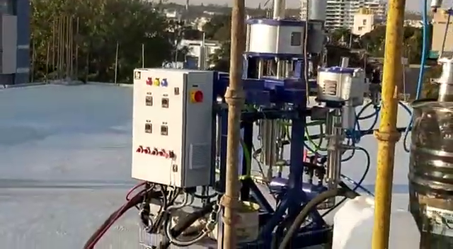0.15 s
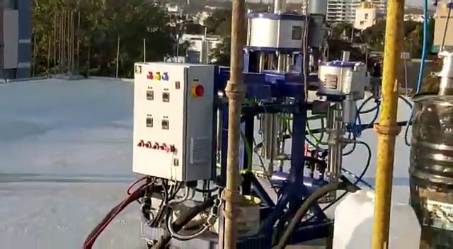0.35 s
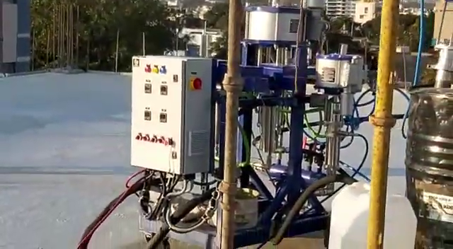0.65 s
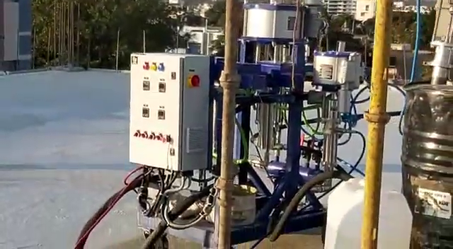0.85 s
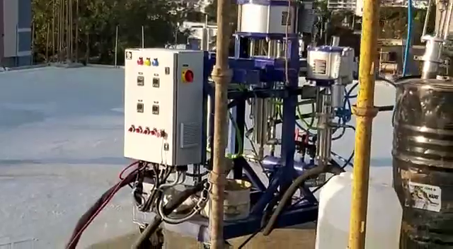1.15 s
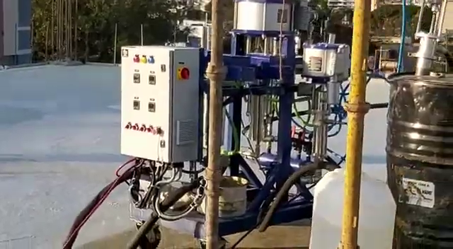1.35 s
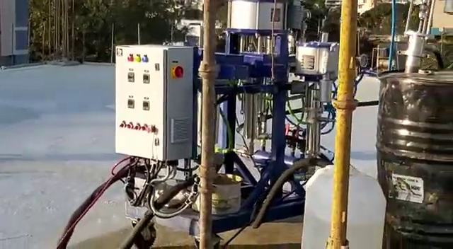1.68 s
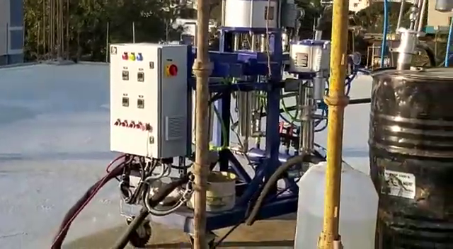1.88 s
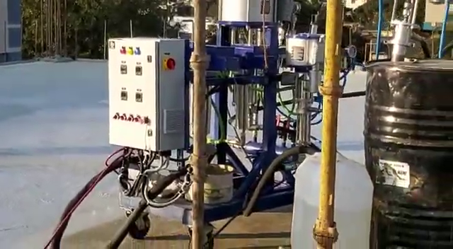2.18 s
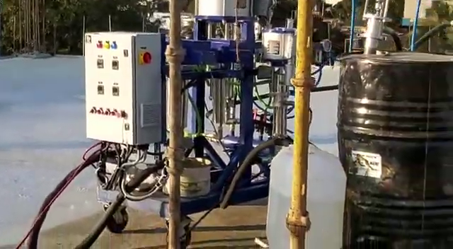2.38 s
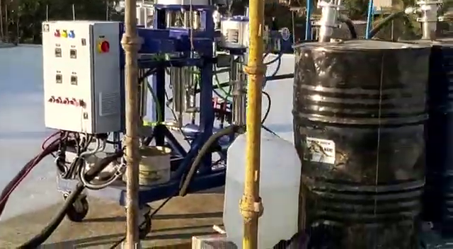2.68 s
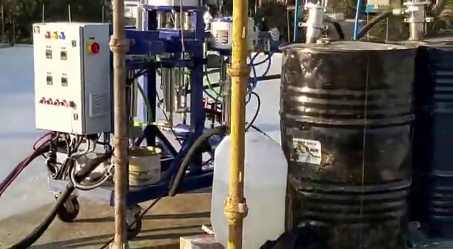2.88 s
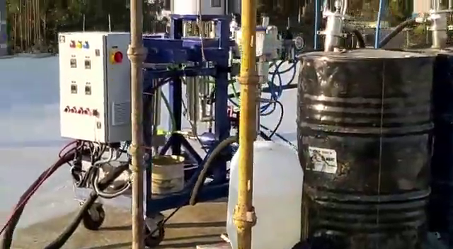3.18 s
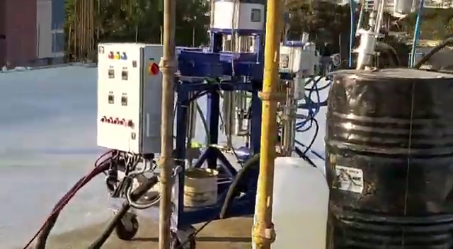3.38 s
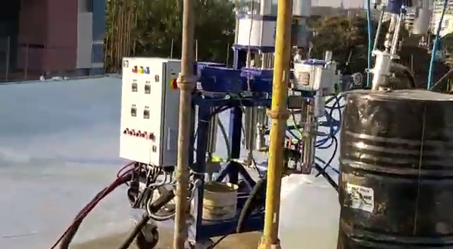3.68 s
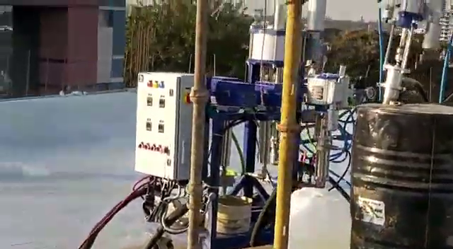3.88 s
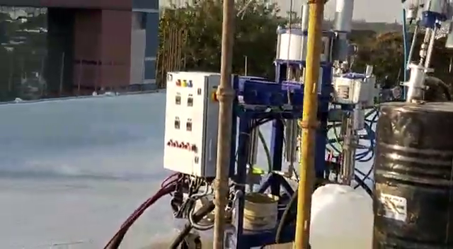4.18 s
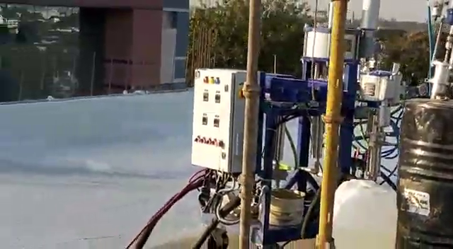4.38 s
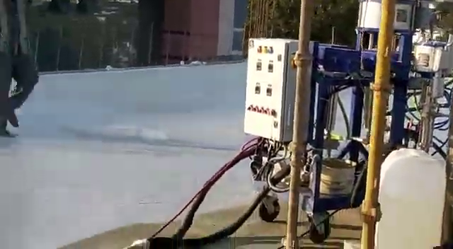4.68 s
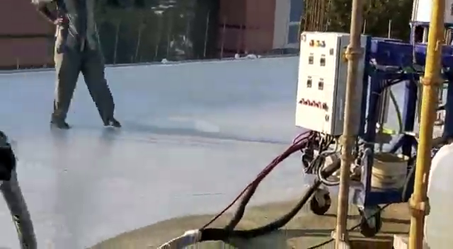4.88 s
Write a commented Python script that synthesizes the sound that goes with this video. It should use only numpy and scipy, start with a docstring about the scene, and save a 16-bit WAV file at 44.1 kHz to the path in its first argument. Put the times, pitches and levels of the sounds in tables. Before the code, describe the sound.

An air-driven pump on an open rooftop thumps and blasts out air three times over a steady, swelling hiss and low rumble.

```python
"""The big pump of an air-driven spray coating rig works on an open rooftop, a few metres from a hand-held phone.
At each end of its stroke a valve thumps and the cylinder dumps its air through a muffler: shaped noise and damped tones.
Smaller feed pumps puff and knock in between: short bursts of coloured noise.
Behind them lie a swelling hiss of escaping air, combed by its bounce off the roof, and a low outdoor rumble."""
import sys
import numpy as np
from scipy import signal
from scipy.fft import irfft
from scipy.io import wavfile

SR = 44100
rng = np.random.default_rng(int(sys.argv[2]) if len(sys.argv) > 2 else 0)


def put_to_file(sound):
    """Save the sound as 16-bit audio at rate SR, in the file named by the first command-line argument."""
    columns = np.atleast_2d(sound).T  # one column per channel
    safe = np.clip(columns, -1, 1)
    whole_steps = np.round(safe * 32767)
    wavfile.write(sys.argv[1], SR, whole_steps.astype(np.int16))


N = 222689
EDGE_HZ = 15950  # all sound lies below this frequency
TIME, FREQ = np.arange(N) / SR, np.fft.rfftfreq(2 ** 18, 1 / SR)

# exhausts of the big pump: start_s, blast_db, full_flow_s, fall_t60_s, valve_thump_db, valve_pitch_hz,
# frame_thud_db, port_resonance_hz, brightness_db_per_octave, wait_until_rebound_s, rebound_db,
# shell_db, down (stroke: 0 up, 1 down)
BIG_PUMP_STROKES = [(0.6443, -15, 0.031, 0.42, -12, 316, -19, 810, -0.9, 0.025, -13.5, 0.5, 0),
                    (2.22, -18.5, 0.051, 0.45, -30, 286, -12.5, 706, 1.5, 0.107, -21.5, -6, 1),
                    (3.982, -15.5, 0.039, 0.38, -12, 341, -20, 658, -1, 0.039, -16, -0.5, 0)]
# coherence of an air jet between the microphone ports: frequency_hz, likeness
JET_LIKENESS = [(100, .98), (1400, .95), (2300, .82), (3400, .5), (5000, .76), (8500, .42), (11000, .85),
                (15500, .76)]


def amp(db):
    """Level law: decibels to an amplitude gain."""
    return 10 ** (np.asarray(db) / 20)


def unit(x):
    """Normalisation: scales a signal to rms 1."""
    return x / np.sqrt(np.mean(x ** 2) + 1e-20)


def read(points, hz):
    """Spectral envelope: interpolates a table on a log-frequency axis."""
    f, value = np.transpose(points)
    return np.interp(np.log(hz + 1), np.log(f + 1), value)


def wander(rate, count=24):
    """Slow modulation of rms 1: sines of random phase from a tenth of rate up to rate (Hz)."""
    knots = np.arange(0, N + 64, 64) / SR
    wave = sum(
        np.sin(2 * np.pi * (f * knots + rng.random()))
        for f in np.geomspace(rate / 10, rate, count)
    )
    return unit(np.interp(TIME, knots, wave))


def patches(shape, rows, columns):
    """Random field of rms 1, made smooth by a Gaussian low-pass along both axes."""
    a, b = np.fft.fftfreq(shape[0])[:, None], np.fft.fftfreq(shape[1])
    smooth = np.exp(-(a * rows) ** 2 - (b * columns) ** 2)
    return unit(np.fft.ifft2(np.fft.fft2(rng.standard_normal(shape)) * smooth).real)


def air(gain, same, phase=0):
    """Turbulence noise: a coloured random spectrum at two ports, partly coherent, left leading by phase (rad)."""
    a, b, c, d = rng.standard_normal((4, len(FREQ)))
    same = np.clip(same, 0, 1)
    left = a + 1j * b
    unlike = c + 1j * d
    right = same * left * np.exp(-1j * phase) + np.sqrt(1 - same ** 2) * unlike
    spectrum = np.array([left, right]) * gain * (FREQ < EDGE_HZ)
    return unit(irfft(spectrum)[:, :N])


def burst(s, rise, hold, t60):
    """Pressure release: a linear rise, full flow until hold seconds, then exponential decay."""
    t = TIME - s
    opening = np.clip(t / max(rise, 1e-4), 0, 1)
    return opening * amp(-60 * np.maximum(t - hold, 0) / t60)


def ring(s, hz, rise, t60):
    """Free vibration of one damped mode."""
    return np.sin(2 * np.pi * hz * (TIME - s)) * burst(s, rise, rise, t60)


def band(hz, width):
    """Resonance curve: gain 1 at the centre and one half at width (Hz) to either side."""
    return 1 / (1 + ((FREQ - hz) / width) ** 2)


def delayed(x, s):
    """Propagation delay: the same sound, s seconds later."""
    return np.pad(x, ((0, 0), (round(s * SR), 0)))[:, :N]


def rumble(lump_db=3.0, lag_s=0.00034, waver=0.0052):
    """Low-passed ambient noise of the town and the breeze, with faint frequency-modulated machine tones."""
    # colour of the noise: frequency_hz, level_db
    rumble_colour = [(20, -39), (35, -17), (60, -2), (95, -2), (140, -3), (200, -8), (290, -6), (400, -10),
                     (500, -17)]
    # coherence between the ports: frequency_hz, likeness
    rumble_likeness = [(30, 0.54), (100, 0.79), (400, 0.91)]
    # course of the noise level: time_s, level_db
    rumble_course = [(0, -37.5), (.55, -32.5), (.95, -38.5), (1.8, -39), (2.7, -36.5), (3.9, -35.5),
                     (5.05, -38)]
    # machine tones: pitch_hz, level_db (rms)
    machine_tones = [(98, -48), (297, -50.5), (393, -56), (2000, -58.5)]
    colour = amp(read(rumble_colour, FREQ)) / (1 + (FREQ / 620) ** 8)
    noise = air(colour, read(rumble_likeness, FREQ), 2 * np.pi * FREQ * lag_s)
    deep = signal.sosfiltfilt(signal.butter(2, 170, fs=SR, output="sos"), noise)
    # the breeze buffets only the deepest part
    low = deep * amp(lump_db * wander(22)) + noise - deep
    tones = np.zeros(N)
    for hz, db in machine_tones:
        cycles = np.cumsum(hz * (1 + waver * wander(8))) / SR
        tones += amp(db) * np.sqrt(2) * np.sin(2 * np.pi * cycles)
    return low * amp(np.interp(TIME, *np.transpose(rumble_course))) + tones


def hiss(lag_s=0.000333, body_db=5.5, fizz_db=6, top_db=2, flicker_db=0.67, grain_db=2.61, swirl_same=0.36, size=1024):
    """Jet noise of escaping air: comb-filtered by its roof reflection, swirling, dulled after each blast."""
    # air flow, before body_db and fizz_db are added: time_s, body_level_db, treble_level_db
    air_flow = [(0.0, -37, -38), (0.6, -33.5, -32), (0.76, -37, -39), (1.03, -39.5, -40.5),
                (1.93, -40, -39.5), (2.25, -39, -36.5), (2.43, -39.5, -43.5), (2.8, -39.5, -41),
                (3.59, -36, -37), (3.95, -33.5, -32.5), (4.11, -35, -38), (4.43, -36.5, -35.5),
                (5.05, -38.5, -39)]
    # colour of the jet: frequency_hz, level_db
    hiss_colour = [(600, -3.5), (950, -6), (1550, -2.5), (2200, 4.5), (3100, -6), (4300, 1.5), (6400, -4.5),
                   (7500, 2.1), (8800, -7.5), (10500, -1.5), (12400, -3.5), (14200, -7), (15600, -11)]
    # coherence between the ports: frequency_hz, likeness
    hiss_likeness = [(600, .74), (1400, .62), (2600, .3), (7500, .32), (12000, .3), (15500, .12)]
    # roof reflection, drifting as the phone moves: time_s, delay_s
    roof_bounce = [(0, .00103), (.55, .00108), (2.9, .00096), (3.45, .00091), (3.97, .00093),
                   (4.15, .00136), (4.7, .00123), (5.05, .00121)]
    # treble level of a calm flow; each growth is per dB of treble above it
    calm_db = -39.5
    comb_db, comb_growth = 0.77, 0.21
    swirl_db, swirl_growth = 1.15, 0.11
    contrast, contrast_growth = 0.84, 0.043
    # each blast drains the air line; refill_s is the time constant of recovery
    drain_db, refill_s = 5, 0.45

    low_cut = FREQ ** 4 / (FREQ ** 4 + 450 ** 4)
    colour = amp(read(hiss_colour, FREQ)) * low_cut
    noise = air(colour, read(hiss_likeness, FREQ), 2 * np.pi * FREQ * lag_s)
    hz, t, z = signal.stft(noise, SR, nperseg=size, noverlap=size * 3 // 4)
    hz = hz[:, None]

    s, *levels = np.transpose(air_flow)
    body, fizz = (np.interp(t, s, level) for level in levels)
    force = np.maximum(fizz - calm_db, 0)
    drained = sum((t > s) * np.exp(-abs(t - s) / refill_s) for s, *_ in BIG_PUMP_STROKES)
    high, highest = (1 / (1 + (edge / (hz + 1)) ** 12) for edge in (6000, 13500))
    db = (1 - high) * (body + body_db) + high * (fizz + fizz_db)
    db = db + highest * (top_db - drain_db * drained)

    # the peaks of the colour stand out more in a strong flow
    relief_db = read(hiss_colour, hz) - np.mean(hiss_colour, axis=0)[1]
    db = db + (contrast + contrast_growth * force - 1) * relief_db
    # sound and reflection alternately add and cancel along the frequency axis
    bounce_s = np.interp(t, *np.transpose(roof_bounce))
    db = db + (comb_db + comb_growth * force) * np.cos(2 * np.pi * hz * bounce_s)

    # broad slow swirls, partly shared by the ports, and fine quick patches of their own
    shared, *own = (patches(db.shape, 24, 90) for _ in range(3))
    grain = np.array([patches(db.shape, 3, 12) for port in z])
    swirl = np.sqrt(swirl_same) * shared + np.sqrt(1 - swirl_same) * np.array(own)
    db = db + (swirl_db + swirl_growth * force) * swirl + grain_db * grain
    out = signal.istft(z * amp(db), SR, nperseg=size, noverlap=size * 3 // 4)[1][:, :N]
    return out * amp(flicker_db * wander(50))


def feed_pumps(same=0.67, whistle_width_hz=400, whistle_db=6, likeness=0.97):
    """Gated turbulence: whistling puffs of the small valves and narrow-band knocks of the linkage."""
    # small air valves: start_s, level_db, rise_s, full_flow_s, fall_t60_s, brightness_db_per_octave, whistle_hz
    valve_puffs = [(0.998, -30, .003, 0.029, 0.16, -0.9, 13550),
                   (1.043, -26, 0.0042, 0.034, 0.31, -1.9, 9600),
                   (1.172, -38, 0.018, 0.05, .15, -0.5, 4230), (2.143, -25, 0.005, 0.038, 0.98, -1.5, 1900),
                   (2.15, -25, 0.005, 0.031, 0.16, 0.5, 12000)]
    # colour of the small valves: frequency_hz, level_db
    puff_colour = [(200, -16.5), (380, -2.5), (520, -17), (720, -6), (1100, -14.5), (1900, -10.5),
                   (3300, -32), (5200, -13), (7400, -13.5), (8700, -21), (10200, -13.5), (13500, -24.5),
                   (15500, -13)]
    # light knocks in the pump linkage: start_s, level_db, pitch_hz, fall_t60_s
    linkage_knocks = [(1.027, -23.5, 13400, 0.041), (1.048, -29.5, 7440, 0.07), (1.206, -28.5, 4800, 0.041),
                      (1.407, -30.5, 780, 0.015)]
    out = np.zeros((2, N))
    phase = -2 * np.pi * FREQ * 4 / SR  # the right port leads by 4 samples
    for s, db, rise, hold, t60, bright, hz in valve_puffs:
        tilt_db = bright * np.log2(FREQ / 2000 + 0.083)
        colour = amp(read(puff_colour, FREQ) + tilt_db + whistle_db * band(hz, whistle_width_hz))
        jet = air(colour, likeness * read(JET_LIKENESS, FREQ), phase)
        out += amp(db) * burst(s, rise, hold, t60) * jet
    for s, db, hz, t60 in linkage_knocks:
        out += amp(db) * burst(s, 0.00056, 0.00094, t60) * air(band(hz, 330), same)
    return out


def rebounds(s, db, count=2):
    """Damped impacts: the piston rebounds as it takes up the load again, each hollow thump weaker than the last."""
    pitch_hz, rise_s, t60_s, gap_s, loss_db = 322.7, 0.0049, 0.078, 0.081, 3
    return sum(
        amp(db - k * loss_db) * ring(s + k * gap_s, pitch_hz, rise_s, t60_s)
        for k in range(count)
    )


def muffler_shell(same=0.96):
    """Resonant decay: the muffler shell and cylinder ring on after each blast as narrow-band noise."""
    # modes, each level added to the stroke's shell_db: pitch_hz, width_hz, level_db, fall_t60_s
    shell_modes = [(293, 83, -28.5, 0.71), (412, 73, -34.5, 1.05), (762, 7.1, -43.5, 0.89),
                   (2344, 150, -30, 0.58), (4600, 880, -33, 0.78)]
    out = np.zeros((2, N))
    for hz, width, db, t60 in shell_modes:
        blows = sum(
            amp(shell_db) * burst(s, 0.006, 0.097, t60)
            for s, *_, shell_db, _ in BIG_PUMP_STROKES
        )
        out += amp(db) * blows * air(band(hz, width / 2), same)
    return out


def exhaust(rise=0.0015, flutter_db=0.36, valve_lead_s=0.00706, valve_rise=0.0023, valve_t60=0.095, thud_hz=85,
            thud_t60=0.093, sharpness=1.32, port_db=4, port_width_hz=45, ripple_db=0.2):
    """Source and filter: valve and frame vibrate while a turbulent jet is coloured by the muffler's passages."""
    # exhaust colour at the two ends of the stroke: frequency_hz, level_db
    up_colour, down_colour = [(60, -19), (180, -21), (320, -6), (520, -11.5), (720, -4), (1000, -14),
                              (1500, -9), (2100, -12.5), (3100, -20), (4700, -14.5), (8500, -26),
                              (11000, -9.5), (13300, -10), (15500, -17)], [(40, -19), (90, -16), (170, -8), (320, 3.5), (540, -7.5),
                                          (750, -3), (1000, -11), (1600, -12.5), (3200, -19), (4800, -16.5),
                                          (7600, -23), (9000, -27), (11000, -12), (15500, -22.5)]
    # passage resonances, before sharpness scales the lift: frequency_hz, width_hz, lift_db
    up_passages, down_passages = [(320, 50, 3), (791, 35, 2), (1120, 55, 5), (1510, 80, 3), (1610, 45, 2),
                                  (1940, 70, 3), (2303, 70, 5), (2394, 60, 5), (2950, 110, 4),
                                  (3330, 400, -6), (3779, 70, 5), (4570, 230, 4), (11100, 250, 3)], [(420, 60, 2), (1125, 100, 6), (1500, 90, 4),
                                                       (1950, 260, 7), (2950, 100, 3), (3500, 300, -3),
                                                       (3785, 80, 4), (4600, 200, 3), (5130, 120, 4),
                                                       (11950, 250, 3)]
    # phase by which the left port leads: frequency_hz, lead_rad
    up_phase, down_phase = [(600, .1), (1500, -.3), (2500, -.45), (3100, -1.3), (4200, -.1), (6000, 0),
                            (7500, -2.2), (9000, -.8), (11000, -2.3), (15500, -2.5)], [(800, .1), (2200, -.25), (3200, -1), (4700, .8), (6000, .6),
                                              (7500, -.8), (9500, .8), (11500, -.3), (13500, -2.5),
                                              (15500, .4)]
    out = np.zeros((2, N))
    for (s, db, hold, t60, valve_db, valve_hz, thud_db, port_hz, bright,
         wait, rebound_db, _, down) in BIG_PUMP_STROKES:
        if down > .5:
            colour, passages, phase = down_colour, down_passages, down_phase
        else:
            colour, passages, phase = up_colour, up_passages, up_phase
        lift_db = sum(sharpness * lift * band(hz, width / 2) for hz, width, lift in passages)
        lift_db = lift_db + port_db * band(port_hz, port_width_hz)
        tilt_db = bright * np.log2(FREQ / 1000 + 1)
        # bounces off the frame and drums ripple the treble, differently at each port
        ripple = ripple_db * patches((2, len(FREQ)), 0, 880) * FREQ / (FREQ + 2000)
        gain = amp(read(colour, FREQ) + lift_db + tilt_db + ripple)
        jet = air(gain, read(JET_LIKENESS, FREQ), read(phase, FREQ))
        out += jet * amp(db + flutter_db * wander(150)) * burst(s, rise, hold, t60)
        # valve and frame move just before the jet; the frame swings the other way
        out += amp(valve_db) * ring(s - valve_lead_s, valve_hz, valve_rise, valve_t60)
        out -= amp(thud_db) * ring(s - .004, thud_hz, 0.004, thud_t60)
        out += rebounds(s + wait, rebound_db)
    return out + muffler_shell()


def rooftop(x, echo_s=.125, echo_db=-13, dull_hz=600):
    """Single reflection in open air: a dull echo comes back from a nearby building."""
    dull = signal.sosfilt(signal.butter(2, dull_hz, fs=SR, output="sos"), x)
    return x + amp(echo_db) * delayed(dull, echo_s)


def scene(right_lift=0.15):
    """Superposition: the pumps, their low notes a little to the right, over hiss and rumble."""
    pumps = rooftop(exhaust() + feed_pumps())
    low = signal.sosfiltfilt(signal.butter(2, 550, fs=SR, output="sos"), pumps)
    return pumps + right_lift * low * np.array([[-1], [1]]) + hiss() + rumble()


def record(dry):
    """Band-pass: a low cut and an upper limit on the whole sound."""
    dry = signal.sosfilt(signal.butter(2, 28, "highpass", fs=SR, output="sos"), dry)
    upper_limit = signal.firwin(511, EDGE_HZ, window=("kaiser", 9), fs=SR)
    return signal.oaconvolve(dry, upper_limit[None], "same", axes=1)


dry = scene()
out = record(dry)
put_to_file(out)
```